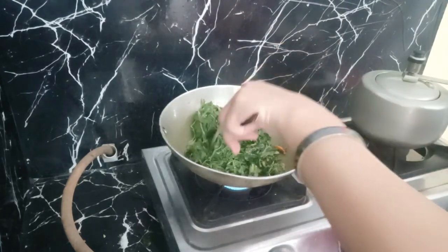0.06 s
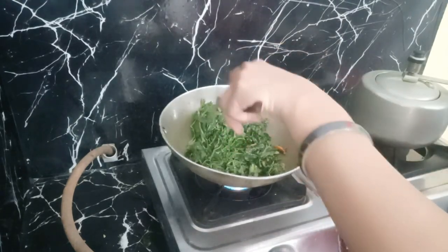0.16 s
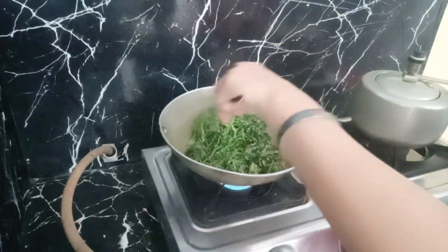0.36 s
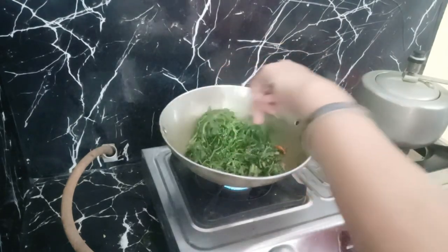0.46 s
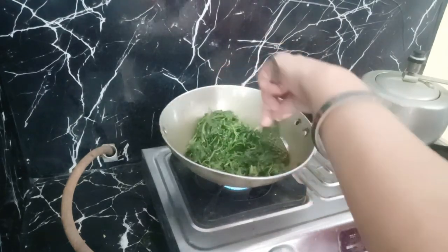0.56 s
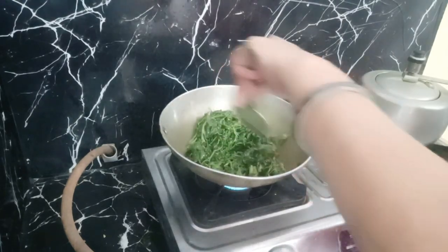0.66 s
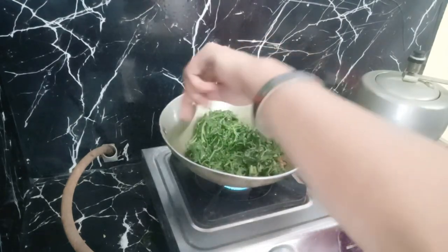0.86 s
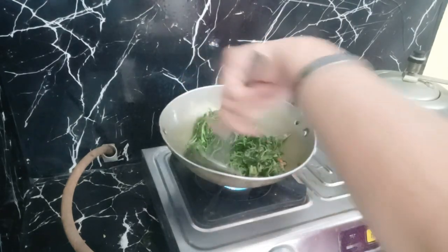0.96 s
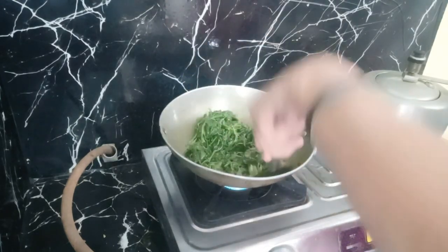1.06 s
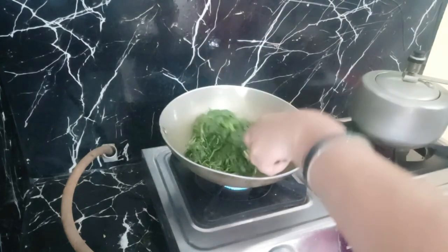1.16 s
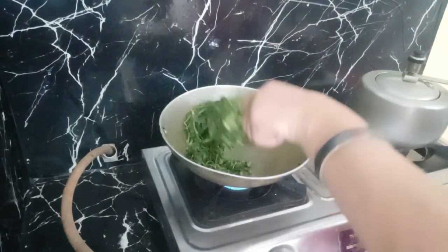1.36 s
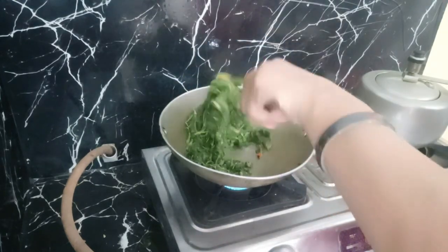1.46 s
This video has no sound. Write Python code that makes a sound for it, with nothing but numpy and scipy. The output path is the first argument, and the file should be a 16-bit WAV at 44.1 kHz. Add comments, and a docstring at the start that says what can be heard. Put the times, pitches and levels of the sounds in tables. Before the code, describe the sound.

A steel spatula knocks and scrapes twice across a thin metal pan over faint frying hiss

```python
"""A soft hiss of gas flame and frying greens runs throughout: shaped noise with dense, tiny high-passed clicks.
Over it a steel spatula is drawn twice through the greens in a thin round pan, in a small hard-walled kitchen.
Each stroke opens with a knock, a burst of decaying modes; the edge then chatters over the metal, and its
stick-slip clicks ring pan and blade. Low thumps sound as the pan rocks on its gas ring.
Two microphone ports colour left and right differently."""
import sys
import numpy as np
from scipy import signal
from scipy.fft import rfft, irfft
from scipy.io import wavfile

SR = 44100
rng = np.random.default_rng(int(sys.argv[2]) if len(sys.argv) > 2 else 0)


def transcribe(u):
    """Save the signal u as a 16-bit wav file named by the first command-line argument.

    u: samples, shape (n,) or (channels, n), limited to [-1, 1]; the rate is SR.
    q: integer samples, one column per channel.
    """
    v = np.clip(np.atleast_2d(u).T, -1, 1)
    q = np.round(v * 32767).astype(np.int16)
    wavfile.write(sys.argv[1], SR, q)


def amplitude_ratio(level_db):
    """Convert a level in decibels to the matching linear amplitude (field) ratio."""
    exponent = np.asarray(level_db, float) / 20
    return 10 ** exponent


N = 66150

PORT_SPLIT_HZ = 473  # the ports hear much the same well below this and differ above it
RING_T = np.arange(int(0.5 * SR)) / SR  # time axis of every impulse response, s

# free modes of spatula and pan below 5 kHz: f/Hz, relative level/dB, t60/s
CLANG_LOW = [(392, -3, .2), (470, -3, .25), (580, -10, .15), (883, -4, .27), (1022, -5, .15),
             (1405, -2, .3), (1880, -8, .27), (2025, 0, .55), (2600, -3, .2), (2708, -1, .5),
             (2900, -5, .35), (3235, -5, .15), (3478, -6, .45), (3860, -8, .2), (4296, -2, .25)]


def rms_one(x):
    """Normalisation: scales the mean power to one."""
    return x / np.sqrt(np.mean(x ** 2) + 1e-20)


def at_hz(points, hz):
    """Logarithmic frequency axis: interpolates a table evenly per octave."""
    f, value = np.array(points)[:, :2].T
    return np.interp(np.log(np.maximum(hz, 1)), np.log(f), value)


def shaped(x, gain):
    """Linear filtering: multiplies the spectrum by a zero-phase gain(frequency)."""
    hz = np.fft.rfftfreq(x.shape[-1], 1 / SR)
    return irfft(rfft(x) * gain(hz), x.shape[-1])


def sided(balance):
    """Interchannel level difference: half the balance goes to each side, with opposite sign."""
    return lambda hz: amplitude_ratio(at_hz(balance, hz) * np.array([[0.5], [-0.5]]))


def grains(per_s, spread_db):
    """Shot noise: random clicks of either sign and uneven size, at unit rms."""
    sizes = amplitude_ratio(spread_db * np.minimum(rng.exponential(1, N), 4))
    signs = rng.choice([-1, 1], N)
    return rms_one(sizes * signs * (rng.random(N) < per_s / SR))


def port_pair(size):
    """Spatial coherence: two noises alike in the bass and unrelated above."""
    mid, side = rng.standard_normal((2, size))
    high = signal.butter(6, PORT_SPLIT_HZ, "high", fs=SR, output="sos")
    return mid + signal.sosfilt(high, side) * [[1], [-1]]


def hiss():
    """Broadband turbulence noise of the flame, with the shot noise of frying water's tiny spits."""
    # spectral density of flame and frying: f/Hz, relative level per Hz/dB
    hiss_spectrum = [(12, -33), (20, -4), (49, -7.5), (86, -12.5), (228, -22.5), (328, -30), (377, -26.5),
                     (759, -28), (1090, -26), (1290, -31), (1860, -26.5), (14700, -32), (16000, -29)]
    # correlation of left with right: f/Hz, coefficient
    likeness = [(60, 1), (150, 1), (380, 0.77), (950, 0.46), (2380, 0.13), (5980, -0.051), (15000, 0.03)]
    # port balance for the hiss: f/Hz, left minus right level/dB
    hiss_balance = [(60, 4), (110, -5), (200, 2), (380, -0.5), (700, 0.5), (1290, 2.5), (2380, -0.5),
                    (4400, 4.5), (8120, -3.5), (15000, 4)]
    noise_db = -49.5  # noise rms before the spits and the port balance
    spits_per_s, spit_db, spit_cut_hz = 3100, -7, 9000  # spit level before its high-pass, re noise

    def alike(f):
        return np.clip(at_hz(likeness, f), -1, 1)

    mid, side = rng.standard_normal((2, N))
    common = shaped(mid, lambda f: np.sqrt(1 + alike(f)))
    opposed = shaped(side, lambda f: np.sqrt(1 - alike(f))) * [[1], [-1]]
    noise = rms_one(shaped(common + opposed, lambda f: amplitude_ratio(at_hz(hiss_spectrum, f))))
    high = signal.butter(2, spit_cut_hz, "high", fs=SR, output="sos")
    # spit sizes are more uneven on the left
    spits = signal.sosfilt(high, [grains(spits_per_s, 6.7), grains(spits_per_s, 4.5)])
    return amplitude_ratio(noise_db) * shaped(noise + amplitude_ratio(spit_db) * spits, sided(hiss_balance))


def clear_ring(modes, spread_db):
    """Modal superposition: damped sines form a stereo impulse response of unit energy."""
    hz, db, t60 = np.transpose(modes)[:, :, None]
    chance = rng.standard_normal((len(modes), 2))
    # the random phase gap between the ports widens with frequency, up to a limit
    phase_gap = chance[:, 1:] * np.minimum(1.5, (hz / PORT_SPLIT_HZ) ** 3 / 6)
    # dividing by sqrt(t60) makes the mode level a measure of energy
    decay = amplitude_ratio(db + spread_db * chance[:, :1] - 60 * RING_T / t60) / np.sqrt(t60)
    angle = 2 * np.pi * hz * RING_T
    ports = [(decay * np.sin(angle + side * phase_gap)).sum(0) for side in (0.5, -0.5)]
    return rms_one(np.array(ports)) / np.sqrt(len(RING_T))


def crowd_ring(low_hz, high_hz, t60):
    """High modal density: overlapping weak modes act as decaying band noise of unit energy."""
    # weaker modes between the clear ones: f/Hz, relative level per Hz/dB
    crowd_spectrum = [(120, -51), (200, -55), (267, 1), (333, -12.5), (399, -2), (470, -6), (543, -25.5),
                      (595, -5.5), (740, -14.5), (904, -7), (1170, -11.5), (1230, -13), (1740, -15.5),
                      (2790, -13.5), (4560, -21), (6550, -7.5), (15400, -15)]

    def gain(f):
        band = 1 / np.sqrt((1 + (low_hz / (f + 1)) ** 12) * (1 + (f / high_hz) ** 12))
        return amplitude_ratio(at_hz(crowd_spectrum, f)) * band

    crowd = shaped(port_pair(len(RING_T)), gain)
    return rms_one(crowd * amplitude_ratio(-60 * RING_T / t60)) / np.sqrt(len(RING_T))


def knocks():
    """Impact excitation: blade on pan gives a crack and a free ring that build over the contact."""
    # knocks: t/s, ring level below 5 kHz/dB, ring level above/dB, crack level/dB, crack's lowest f/Hz
    # each level is the energy spread over 10 ms, before the contact ramp
    knock_rows = [(0.202, -28, -29.5, -24, 1200), (0.7161, -21.5, -15.5, -16.5, 497),
                  (0.877, -63, -36, -27, 6200), (0.899, -50, -58, -22, 2200), (0.958, -45, -39, -37, 3500)]
    # free modes above 5 kHz: f/Hz, relative level/dB, t60/s
    clang_high = [(5240, -2, .24), (5880, -4, .14), (6660, -5, .2), (7290, -1, .2), (7927, -1, .07),
                  (8470, 0, .1), (9240, -6, .14), (10440, -5, .08), (10905, -2, .18), (11985, -6, .16),
                  (13200, -6, .12), (14340, -9, .12)]
    spread_db, contact_s, crack_t60_s = 2.0, 0.002, 0.026
    out = np.zeros((2, N + SR))
    ramp = np.minimum(1, RING_T / contact_s)
    for s, low_db, high_db, crack_db, crack_hz in knock_rows:
        ring = amplitude_ratio(low_db) * clear_ring(CLANG_LOW, spread_db)
        ring = ring + amplitude_ratio(high_db) * clear_ring(clang_high, spread_db)
        ring = ring + amplitude_ratio(crack_db) * crowd_ring(crack_hz, 16500, crack_t60_s)
        start = int(s * SR)
        # SR / 100 samples last 10 ms
        out[:, start:start + len(RING_T)] += np.sqrt(SR / 100) * ring * ramp
    return out[:, :N]


def scrape():
    """Stick-slip excitation: rapid slips of the edge ring the modes as each place on the pan allows."""
    # edge contact, three runs: t/s, level of blade modes below 9 kHz/dB, level of those above/dB
    strokes = [
        [(0.202, -22.5, -27), (0.22, -26.5, -22), (0.236, -22.5, -28.5), (0.278, -37.5, -40), (0.289, -28, -30)],
        [(0.289, -23, -34), (0.297, -16.5, -21.5), (0.335, -20, -23.5), (0.393, -26.5, -36),
         (0.427, -25, -33.5), (0.52, -66.5, -70)],
        [(0.716, -33, -10), (0.718, -24, -23.5), (0.77, -29.5, -32.5), (0.802, -22.5, -24.5), (0.828, -26, -27),
         (0.87, -37, -37), (0.88, -15, -20), (0.89, -35, -42), (0.934, -38.5, -39), (0.95, -44, -41),
         (0.962, -23, -27), (0.976, -26.5, -31.5), (1.08, -37.5, -47.5), (1.104, -49, -61), (1.14, -76, -57)],
    ]
    # blade bearing down and driving the bowl, three runs: t/s, low-mode level/dB, upper-mode level/dB
    presses = [
        [(0.282, -36.5, -42.5), (0.318, -17, -18.5), (0.398, -29.5, -35.5), (0.426, -39, -42),
         (0.436, -30, -40.5), (0.482, -57, -52), (0.5, -41, -46)],
        [(0.716, -31, -32), (0.724, -23.5, -27.5), (0.746, -25.5, -24.5), (0.79, -43.5, -48)],
        [(0.89, -44, -24.5), (0.904, -44.5, -31), (0.914, -29.5, -27), (0.924, -25.5, -30), (0.94, -27, -33),
         (0.972, -30.5, -29), (1.004, -25.5, -26.5), (1.07, -41.5, -41.5), (1.098, -71, -49.5),
         (1.12, -40, -62)],
    ]
    # light skimming that keeps the free ring going, two runs: t/s, level/dB
    skims = [
        [(0.204, -33), (0.285, -41)],
        [(0.77, -31), (0.804, -36), (0.822, -34.5), (0.866, -53), (0.89, -39)],
    ]
    # low pan modes damped by the contact: f/Hz, relative level/dB, t60/s
    pan_low = [(276, 1, .2), (392, 0, .25), (470, 1, .38), (600, -7, .1), (812, -5, .1), (886, -3, .22),
               (940, -5, .1), (1020, -4, .14), (1226, -6, .14), (1405, -8, .12)]
    # upper pan modes damped by the contact: f/Hz, relative level/dB, t60/s
    pan_upper = [(2064, 0.5, 0.042), (2420, -2.5, 0.098), (2580, 6.5, 0.027), (2735, -11, 0.028),
                 (2954, -2, 0.11), (3900, -4.5, 0.21)]
    # blade modes below 9 kHz: f/Hz, relative level/dB, t60/s
    blade = [(5240, -8, .12), (6050, -2, .14), (6430, -1, .16), (6660, 1, .25), (6900, -3, .12),
             (7220, -1, .08), (7290, -2, .08), (7830, -3, .06), (8460, -3, .07)]
    # blade modes above 9 kHz: f/Hz, relative level/dB, t60/s
    blade_top = [(9240, -1, .05), (9990, -1, .05), (10905, 0, .09), (11985, -1, .07), (13200, -3, .05),
                 (14500, -3, .04)]
    # one row per layer: crowd's lowest f/Hz, highest f/Hz, crowd re clear modes/dB, crowd t60/s, slips per s
    groups = [(200, 1500, -1, .09, 1500), (1500, 4600, 5, .07, 2500), (4600, 9000, 3, .06, 5000),
              (9000, 16000, 5, .05, 6000), (300, 4200, -7, .04, 900)]
    slip_spread_db = 3.5
    places, place_s, place_spread_db = 5, 0.045, 3.5  # the moving edge cycles through the places

    # modes, level curves, level column
    layers = [(pan_low, presses, 1), (pan_upper, presses, 2), (blade, strokes, 1),
              (blade_top, strokes, 2), (CLANG_LOW, skims, 1)]
    out, t = np.zeros((2, N)), np.arange(N) / SR
    for (modes, runs, column), (low_hz, high_hz, crowd_db, crowd_t60, per_s) in zip(layers, groups):
        level = np.zeros(N)
        for run in map(np.array, runs):
            level += amplitude_ratio(np.interp(t, run[:, 0], run[:, column], left=-150, right=-150))
        # the divisor offsets the energy that the crowd adds
        slips = level * grains(per_s, slip_spread_db) / np.hypot(1, amplitude_ratio(crowd_db))
        # random jitter blends each place into the next
        place = (t / place_s + rng.random(N)).astype(int) % places
        for p in range(places):
            ring = clear_ring(modes, place_spread_db)
            ring = ring + amplitude_ratio(crowd_db) * crowd_ring(low_hz, high_hz, crowd_t60)
            out += signal.fftconvolve((slips * (place == p))[None], ring, axes=1)[:, :N]
    return out


def kitchen(x):
    """Diffuse reverberation: convolution with dull, exponentially decaying noise after a short gap."""
    t60_s, level_db, wall_cut_hz, gap_s = 0.36, -15.5, 6600, 0.006  # level re direct sound
    tail = port_pair(len(RING_T)) * amplitude_ratio(-60 * RING_T / t60_s) * (RING_T > gap_s)
    tail = shaped(tail, lambda f: 1 / np.sqrt(1 + (f / wall_cut_hz) ** 2))
    tail = rms_one(tail) / np.sqrt(len(RING_T))
    return amplitude_ratio(level_db) * signal.fftconvolve(x, tail, axes=1)[:, :N]


def thumps():
    """Damped oscillation: the pan rocks and sounds one soft low mode of pan and ring together."""
    # rocking: t/s, level before rise and decay/dB
    rocks = np.array([(0.308, -45), (0.722, -22.5), (0.907, -35.5), (1.006, -30.5)])
    mode_hz, rise_s, t60_s = 170.2, 0.0086, 0.15
    since = np.maximum(np.arange(N) / SR - rocks[:, :1], 0)
    rise = 1 - np.exp(-since / rise_s)
    decay = amplitude_ratio(rocks[:, 1:] - 60 * since / t60_s)
    return (rise * decay * np.sin(2 * np.pi * mode_hz * since)).sum(0)


def scene():
    """Superposition: metal, direct and reverberant, passes the two ports and joins thumps and hiss."""
    # port balance for the metal: f/Hz, left minus right level/dB
    port_balance = [(60, -6), (83, -8), (110, 16), (160, -2), (220, -2.5), (300, 3.5), (420, -3),
                    (580, 1.5), (810, -0.5), (1120, 5.5), (1540, 1.5), (2140, 2), (2960, 0.0), (4090, 4),
                    (5660, 8), (7830, 0), (10800, -7.5), (15000, 17.5)]
    pan_floor = signal.butter(4, 205, "high", fs=SR, output="sos")  # Hz
    metal = signal.sosfilt(pan_floor, scrape() + knocks())
    return shaped(metal + kitchen(metal), sided(port_balance)) + thumps() + hiss()


def band_limit(x):
    """A steep low-pass at the top of the band."""
    return signal.sosfilt(signal.butter(12, 16640, fs=SR, output="sos"), x)


def record(dry):
    """Band limiting: the microphone drops the deepest bass and the top is shelved off."""
    mic_floor_hz, top_cut_hz, above_cut_db = 62, 15450, -33

    def response(f):
        shelf = amplitude_ratio(above_cut_db * (f > top_cut_hz))
        return shelf / np.sqrt(1 + (mic_floor_hz / (f + 1)) ** 4)

    return band_limit(shaped(dry, response))


dry = scene()
out = record(dry)
transcribe(out)
```